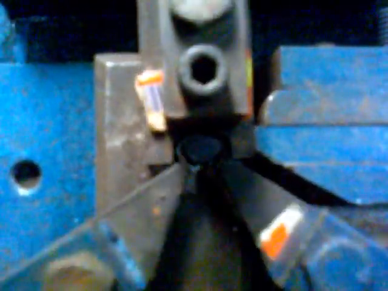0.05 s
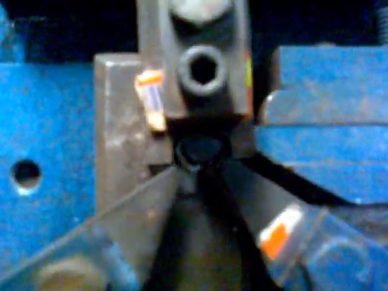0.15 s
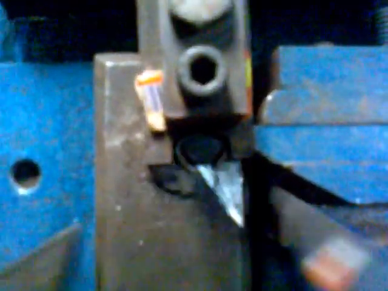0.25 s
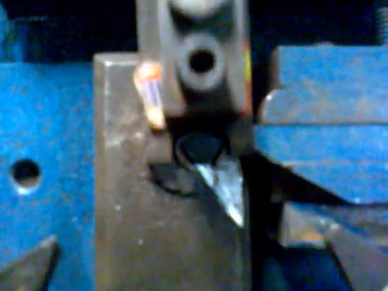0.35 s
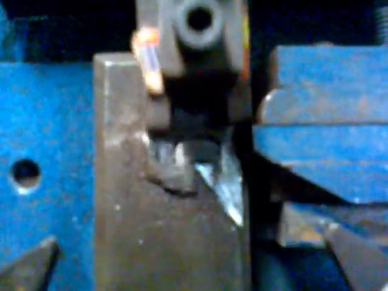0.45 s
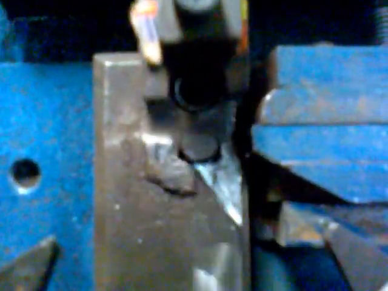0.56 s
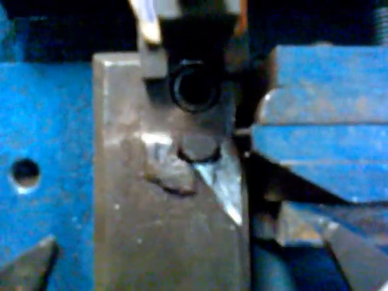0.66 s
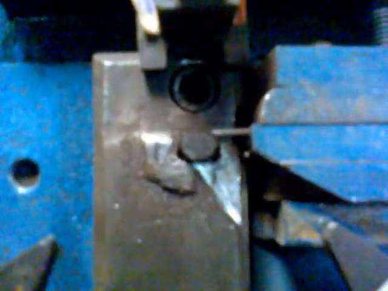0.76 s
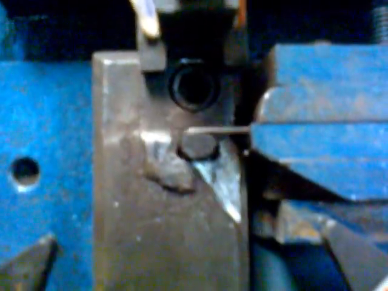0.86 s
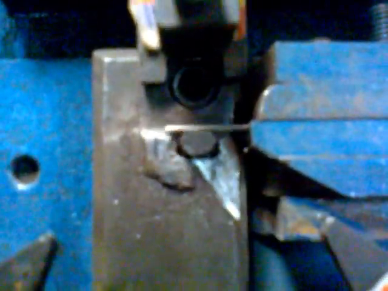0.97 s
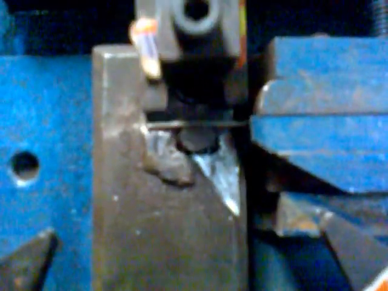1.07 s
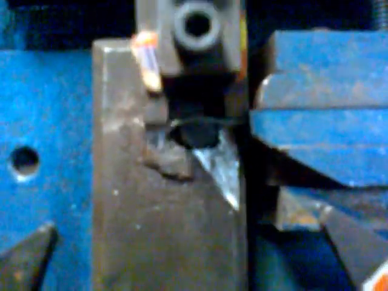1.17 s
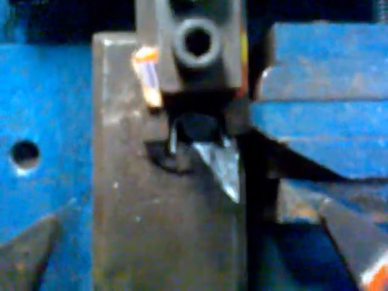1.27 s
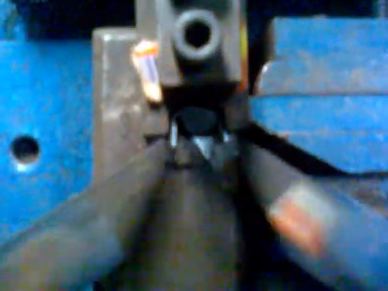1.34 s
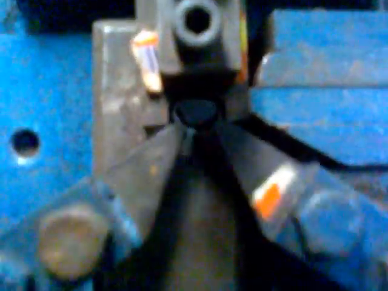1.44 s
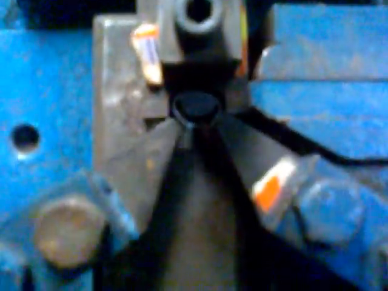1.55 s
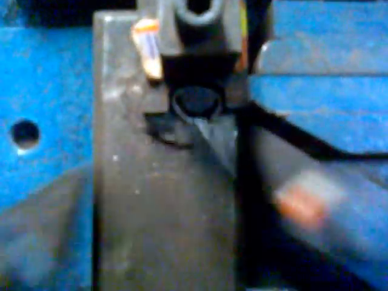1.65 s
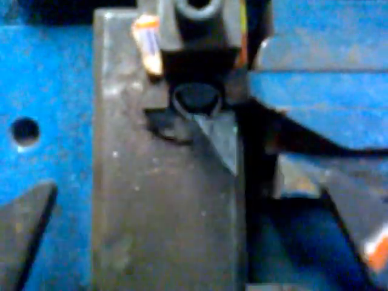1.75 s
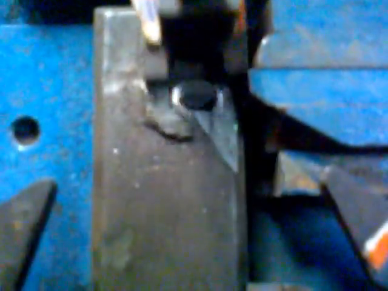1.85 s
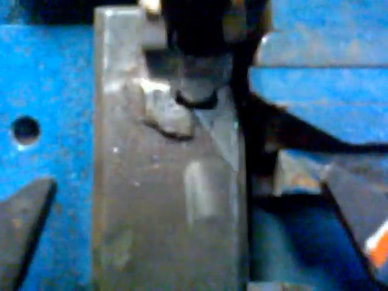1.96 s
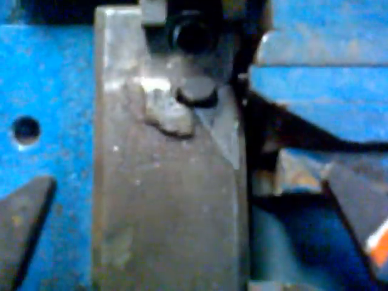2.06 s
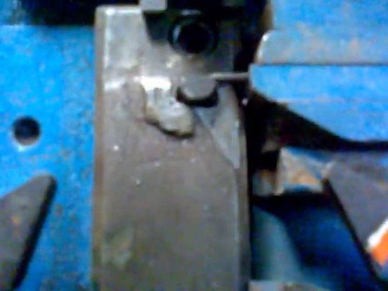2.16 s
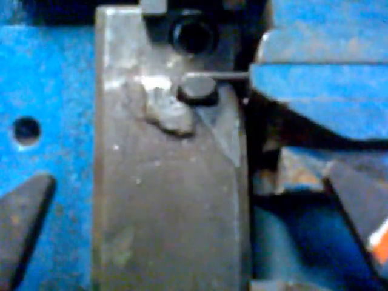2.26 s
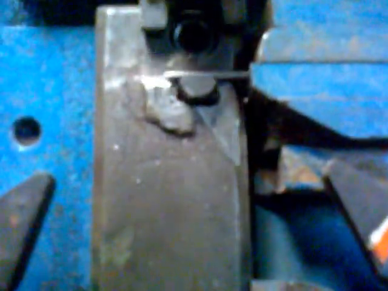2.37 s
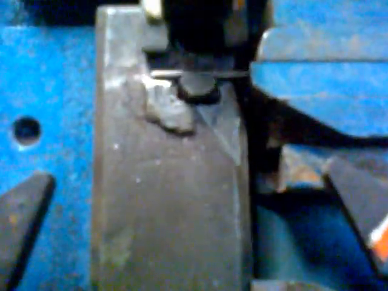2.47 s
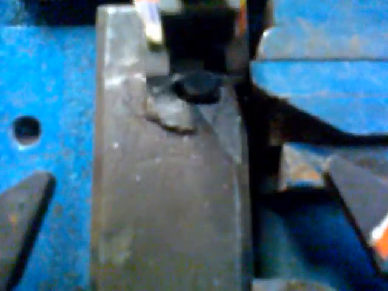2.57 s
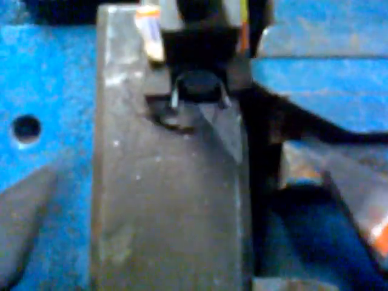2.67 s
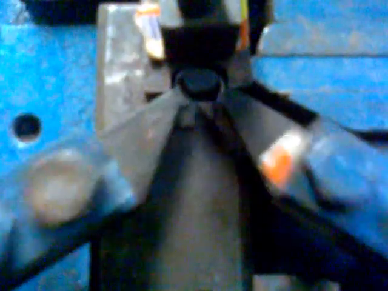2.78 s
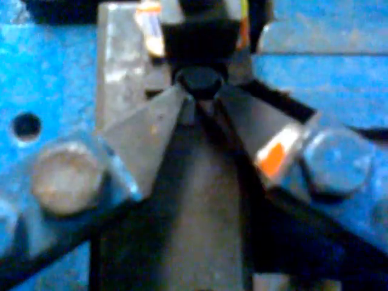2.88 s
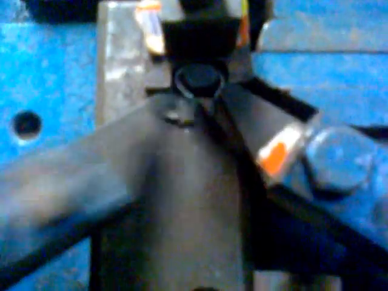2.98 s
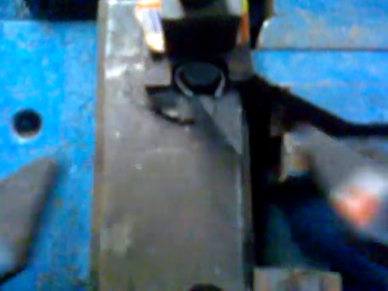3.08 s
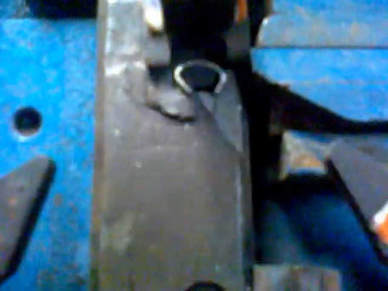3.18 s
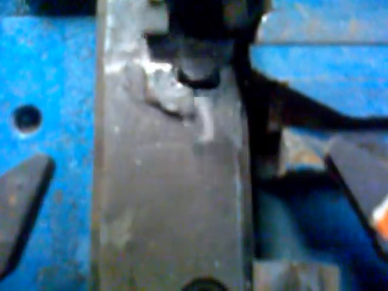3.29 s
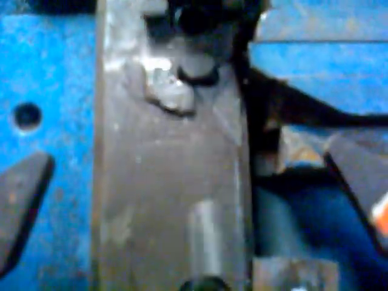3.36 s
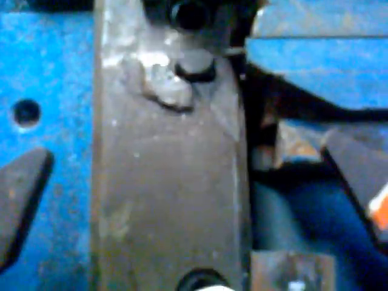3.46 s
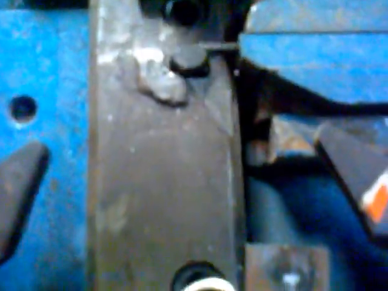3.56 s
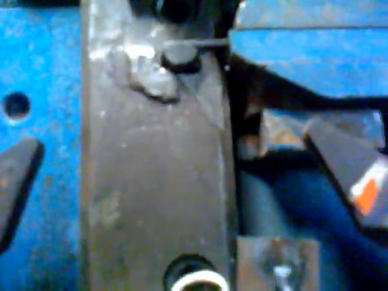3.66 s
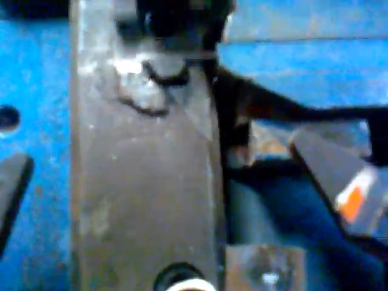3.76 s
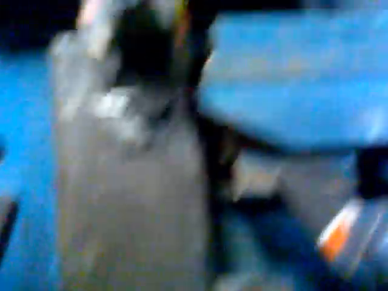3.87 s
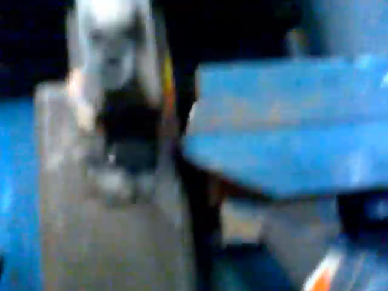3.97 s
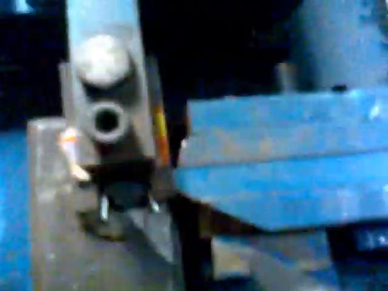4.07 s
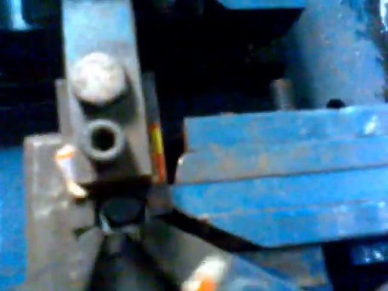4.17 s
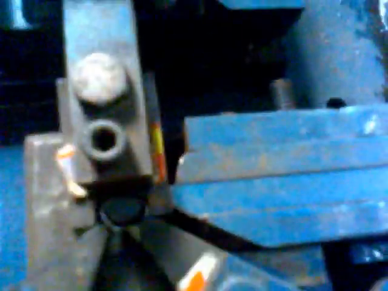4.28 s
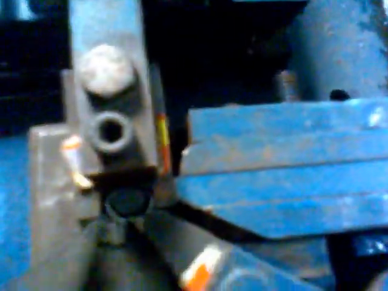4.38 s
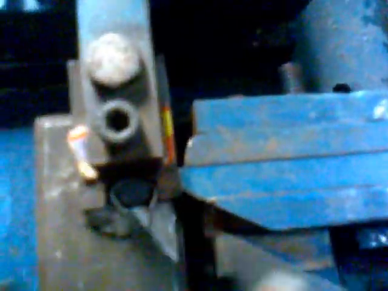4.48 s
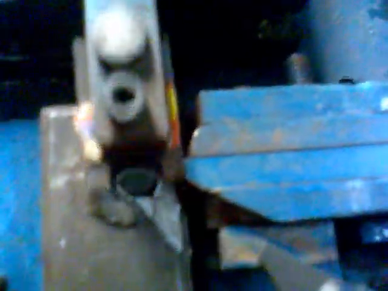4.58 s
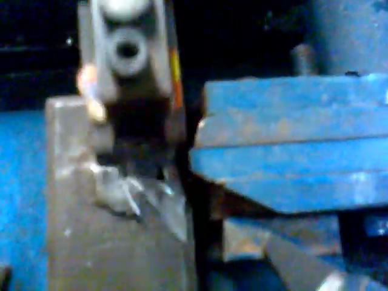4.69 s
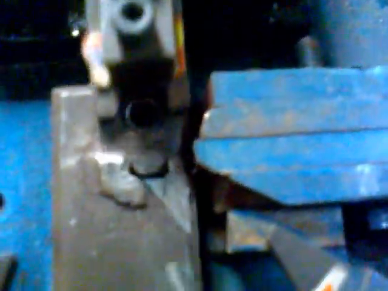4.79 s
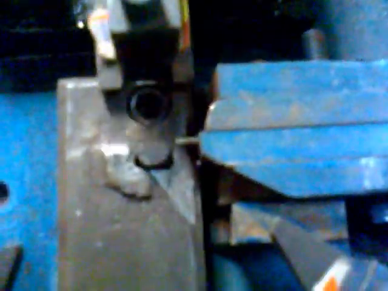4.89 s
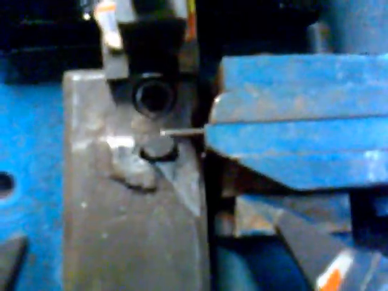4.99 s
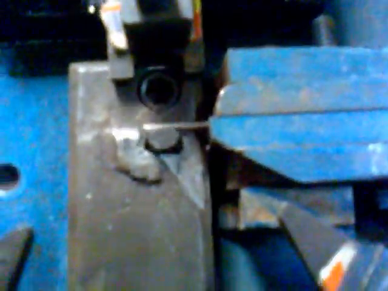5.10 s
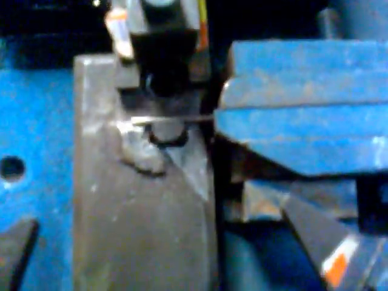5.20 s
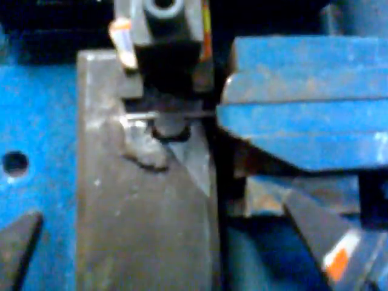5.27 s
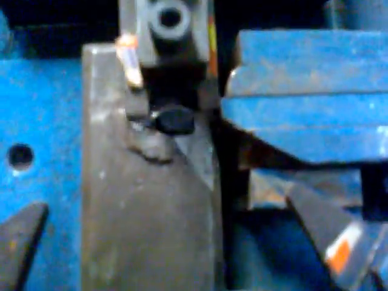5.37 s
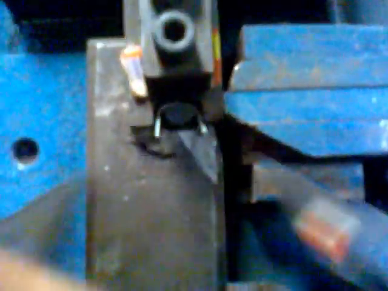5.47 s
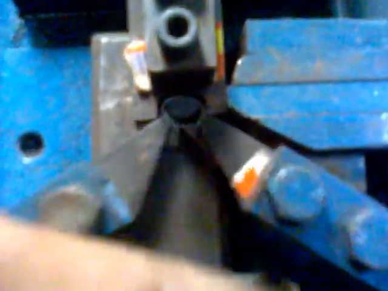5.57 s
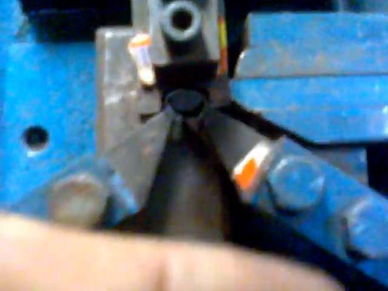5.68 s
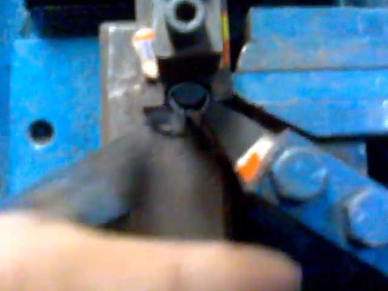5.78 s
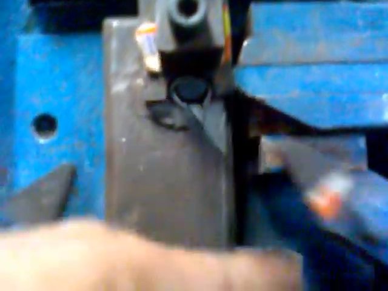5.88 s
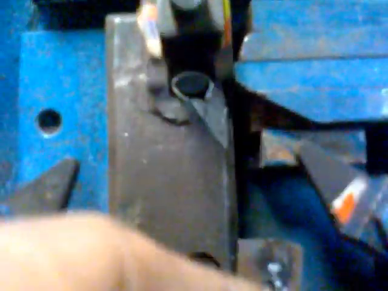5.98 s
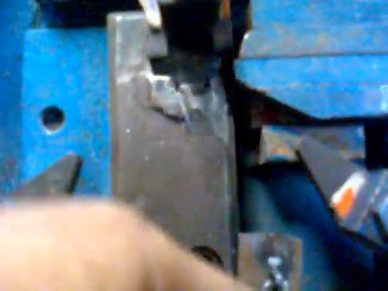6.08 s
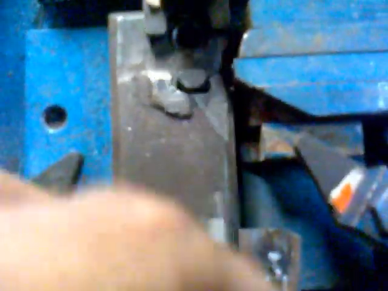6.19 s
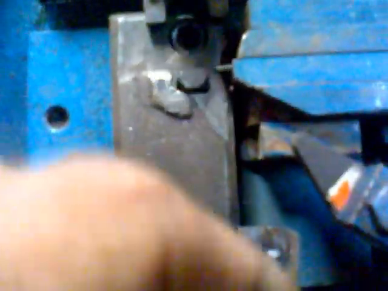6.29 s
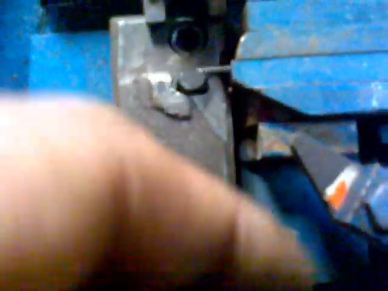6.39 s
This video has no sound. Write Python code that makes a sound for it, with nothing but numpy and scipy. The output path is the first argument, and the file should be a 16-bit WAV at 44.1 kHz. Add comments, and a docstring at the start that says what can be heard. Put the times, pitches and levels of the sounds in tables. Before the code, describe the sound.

Close, loud metallic clatter repeats every 1.4 seconds over a low grinding rumble; a small ring skitters and a piece of wire lands sharply at the end.

```python
"""Close to a wire-bending machine: cams and motor rumble throughout, over faint shop noise and hiss.
Five cycles, one about every 1.4 s: the slide cuts the wire, two arms bend it and swing open, the slide lifts.
Blows are filtered noise plus fading tones; a steel stop and the arms ring on, and small joints tick.
The microphone is jolted at 4 s, a bent ring skitters from 4.8 s, and the loudest loose wire lands at 6.3 s.
The overloaded microphone rounds off the loudest peaks."""
import sys
import numpy as np
from scipy import signal
from scipy.fft import rfft, irfft
from scipy.io import wavfile

SR = 44100
rng = np.random.default_rng(int(sys.argv[2]) if len(sys.argv) > 2 else 0)


def unload_wav(signal):
    """Save mono or channel-first audio to the path in sys.argv[1] as 16-bit WAV at rate SR, clipped to [-1, 1]."""
    wavfile.write(
        sys.argv[1],
        SR,
        np.round(np.clip(np.atleast_2d(signal).T, -1, 1) * 32767).astype(np.int16),
    )


N = 284004

# Strokes of the machine, all listed as (time [s], relative level [dB]).
# The slide cuts the wire: (time [s], level [dB])
CUT_STROKES = [(0.0057, 0), (1.4033, 0.5), (2.806, 0), (4.2048, 0), (5.6027, -1.5)]
# The second arm lands and grips the wire: (time [s], level [dB])
GRIP_STROKES = [(0.0871, 1), (1.4861, -1), (2.8872, -0.064), (4.288, -0.75), (5.6803, -0.077)]
# The arms close on the steel stop: (time [s], level [dB])
CLOSE_STROKES = [(0.1722, -0.67), (1.5704, -0.051), (2.9717, 0), (4.371, -1.4), (5.7672, 0)]
# The arms swing open: (time [s], level [dB])
OPEN_STROKES = [(0.3777, -2), (1.7756, -3.5), (3.173, -0.5), (4.5746, 0), (5.9711, -5)]
# The slide lifts: (time [s], level [dB])
LIFT_STROKES = [(0.489, -1.3), (1.8851, 1), (3.2845, 0.16), (4.6837, 0.91), (6.0828, 1)]
# Tone colour of the lifting slide, also used for the ticking joints: (frequency [Hz], relative level [dB])
LIFT_SPECTRUM = [(40, -21.5), (130, -20.5), (250, 0), (450, -5.5), (900, 6.5), (1150, 3), (1900, 7.5),
                 (2850, 2), (3700, 5), (4700, -3.5), (6100, -2.5), (7000, -13), (10500, -16.5),
                 (15000, -29)]
# Tone colour of scraping wire: (frequency [Hz], relative level [dB])
SCRAPE_SPECTRUM = [(1000, -17), (3600, -12), (4600, 9), (5300, -4), (6200, 2.5), (7600, -2.5), (9500, -15),
                   (11500, -5), (13000, -20), (15000, -12)]


def amp(db):
    """Turns decibels into a plain multiplier."""
    return 10 ** (np.asarray(db) / 20)


def evened(x):
    """Scales a sound to an average (rms) strength of 1."""
    return x / np.sqrt(np.mean(x ** 2) + 1e-20)


def read(points, hz):
    """Reads a curve between its points, with frequency spaced as the ear hears it (logarithmically)."""
    f, value = np.transpose(points)
    return np.interp(np.log(hz + 1), np.log(f + 1), value)


def add(mix, s, sound):
    """Mixes a sound in at time s, cutting off what runs past the end."""
    part = mix[max(0, round(s * SR)):][:len(sound)]
    part += sound[:len(part)]


def noise(colour, count=N):
    """Steady noise with a given tone colour and an rms of 1."""
    gain = amp(read(colour, np.fft.rfftfreq(count, 1 / SR)))
    return evened(irfft(rfft(rng.standard_normal(count)) * gain, count))


def drift(hz):
    """Slow random wandering, up to roughly hz swings a second, with an rms of 1."""
    keep_slow = np.exp(-(np.fft.rfftfreq(N, 1 / SR) / hz) ** 2)
    return evened(irfft(rfft(rng.standard_normal(N)) * keep_slow, N))


def fuzzy(hz, width_hz, count):
    """A tone blurred into a narrow band of noise, with an rms of 1."""
    lowpass = signal.butter(2, width_hz / 2, fs=SR, output="sos")
    band = signal.sosfilt(lowpass, rng.standard_normal((2, count + SR // 4)))
    wobble = (band[0] + 1j * band[1])[-count:]  # the filter has settled by then
    return evened((wobble * np.exp(2j * np.pi * hz * np.arange(count) / SR)).real)


def causal(gain_db):
    """A filter with this tone colour whose energy comes as early as possible (minimum phase)."""
    log_gain = np.log(amp(np.r_[gain_db, gain_db[-2:0:-1]]))
    return np.fft.ifft(np.exp(np.conj(signal.hilbert(log_gain)))).real


def ring(modes, t):
    """Fading sine tones, each started at a random point of its swing."""
    return sum(amp(db - 60 * t / t60) * np.sin(2 * np.pi * (hz * t + rng.random())) for hz, db, t60 in modes)


def dense_ring(t60s, size=16384):
    """Stands for countless close tones: noise split into bands that each fade at their own speed."""
    t, hz = np.arange(size) / SR, np.fft.rfftfreq(size, 1 / SR)
    centres = [f for f, _ in t60s]
    spectrum = rfft(rng.standard_normal(size))
    out = np.zeros(size)
    for band, (_, t60) in zip(np.eye(len(t60s)), t60s):
        share = read(list(zip(centres, band)), hz)  # 1 at its own centre, 0 at the neighbours
        out += irfft(spectrum * share) * amp(-60 * t / t60)
    return out


def drive():
    """The drive whines as blurred, unsteady tones over the steady noise of the shop."""
    # Shop noise: (frequency [Hz], relative level [dB])
    shop_spectrum = [(15, -32.5), (25, -13), (43, 3), (175, -8), (217, 5), (394, -6.5), (439, -7.5),
                     (714, 3), (863, -5), (1440, -6), (1740, -4), (4490, -30), (6210, -51.5), (7110, -54.5),
                     (16000, -52.5)]
    # Whine tones: (frequency [Hz], width [Hz], level [dB])
    whine_tones = [(87.6, 9, -56), (572, 8.3, -54.5), (604, 14, -58), (675, 9, -58), (692, 3.1, -52.5)]
    whine = sum(amp(db) * fuzzy(hz, width, N) for hz, width, db in whine_tones)
    return whine + amp(-47) * noise(shop_spectrum)


def cam_load():
    """The load on the cams in dB; its curve starts over at every cut."""
    # Load through a cycle: (time since the cut [s], relative level [dB])
    load_curve = [(0, -25.5), (.16, -27.5), (.27, -30.5), (.5, -25), (.78, -36), (1.02, -45.5),
                  (1.28, -42.5), (1.4, -31.5)]
    t, starts = np.arange(N) / SR, np.array([s for s, _ in CUT_STROKES])
    cycle = np.maximum(np.searchsorted(starts, t) - 1, 0)
    return np.interp(t - starts[cycle], *np.transpose(load_curve))


def cams(gain_db, grains_per_s=200, grain_share=0.6, flutter_db=-1.0, dull_hz=4500):
    """Rollers grind over the cams: steady noise and small dull rattles, louder under load."""
    # Rumble: (frequency [Hz], relative level [dB])
    cam_spectrum = [(18, -43.5), (30, -10), (75, -1), (311, -1), (394, -1), (499, -3), (666, 4),
                    (866, -9.5), (1280, -5.5), (2750, -19), (3580, -15), (5450, -26.5), (16000, -42)]
    grains = rng.standard_normal(N) * (rng.random(N) < grains_per_s / SR)
    t = np.arange(2048) / SR
    grain = rng.standard_normal(len(t)) * amp(-60 * t / 0.18)
    colour = causal(read(cam_spectrum, np.fft.rfftfreq(len(t), 1 / SR)))
    rattle = signal.fftconvolve(grains, signal.fftconvolve(grain, colour))[:N]
    rattle = evened(signal.sosfilt(signal.butter(2, dull_hz, fs=SR, output="sos"), rattle))
    share = np.clip(grain_share, 0, 1)
    level = amp(cam_load() + gain_db + flutter_db * drift(23))
    return level * (np.sqrt(share) * rattle + np.sqrt(1 - share) * noise(cam_spectrum))


def feed():
    """Wire rubs through the feed guide: a narrow band of noise, some hissing, one thin, often sinking in pitch."""
    # Rubs: (time [s], length [s], start pitch [Hz], end pitch [Hz], half width [Hz], level before the fades [dB])
    rubs = [(1.07, 0.15, 4480, 4670, 302, -56), (1.075, 0.17, 7160, 7160, 40, -66),
            (2.29, 0.13, 4570, 3700, 330, -53), (3.519, 0.125, 4670, 4370, 330, -58),
            (3.603, 0.14, 4500, 3680, 330, -51.5)]
    out = np.zeros(N)
    for s, length, start_hz, end_hz, half_width_hz, db in rubs:
        count = round(length * SR)
        lowpass = signal.butter(2, half_width_hz, fs=SR, output="sos")
        band = signal.sosfilt(lowpass, rng.standard_normal(SR))[:count]
        glide = np.sin(2 * np.pi * np.cumsum(np.linspace(start_hz, end_hz, count)) / SR)
        add(out, s, amp(db) * evened(band * glide) * np.hanning(count))
    return out


def chatter(gain_db, ticks_per_s=130, spread_db=4.5, t60=0.011, steepness=2.2, size=2048):
    """Loose joints tick at random while the cams are loaded and fade steeply as the load eases."""
    happens = rng.random(N) < ticks_per_s / SR
    strength = amp(spread_db * np.minimum(rng.exponential(1, N), 3)) * happens
    crack = rng.standard_normal(size) * amp(-60 * np.arange(size) / SR / t60)
    tick = signal.fftconvolve(crack, causal(read(LIFT_SPECTRUM, np.fft.rfftfreq(size, 1 / SR))))
    load_db = cam_load()
    level = amp(gain_db + steepness * (load_db - load_db.max()))
    return level * evened(signal.fftconvolve(strength, tick)[:N])


def thumps(rise=0.005, width=0.3):
    """Heavy moves shake the bed with short, dull booms (blurred fading tones); one jolt shakes the microphone."""
    # Thumps in every cycle: (time since the cut [s], relative level [dB], pitch [Hz], time to fade by 60 dB [s])
    bed_thumps = [(-.001, -12, 223, 0.089), (0.077, -23, 80, 0.11), (0.174, -23, 70, 0.085)]
    # Booms of the one jolt: (time [s], relative level [dB], pitch [Hz], time to fade by 60 dB [s])
    jolt_booms = [(4.003, -26.5, 314, 0.037), (4.004, -16.5, 448, 0.038), (4.005, -16, 618, 0.055)]
    out, t = np.zeros(N), np.arange(SR // 3) / SR
    booms = [(s + delay, db, hz, t60) for s, _ in CUT_STROKES for delay, db, hz, t60 in bed_thumps]
    for s, db, hz, t60 in booms + list(jolt_booms):
        level = amp(db - 60 * t / t60) * (1 - np.exp(-t / rise))
        add(out, s, level * fuzzy(hz, width * hz, len(t)))
    return out


def skitter(skips_per_s=170, t60=0.048, scrape_share=0.21, flutter_db=4.5, count=90, channels=3):
    """A bent ring skips and scrapes down the chute; each touch sounds many thin tones."""
    # Loudness of the skitter: (time [s], relative level [dB])
    skitter_level = [(4.78, -64), (4.86, -44), (4.96, -50), (5.07, -50), (5.11, -56), (5.17, -49.5),
                     (5.249, -62), (5.32, -56.5), (5.39, -87)]
    t = np.arange(SR // 8) / SR
    hz = rng.uniform(3500, 15500, count)
    touches = np.zeros(N)
    for side in np.array_split(hz, channels):  # each side of the ring has its own tones
        skips = rng.standard_normal(N) * (rng.random(N) < skips_per_s / SR)
        tones = ring([(f, read(SCRAPE_SPECTRUM, f), t60) for f in side], t)
        touches += signal.fftconvolve(skips, tones)[:N]
    s, db = np.transpose(skitter_level)
    level = np.interp(np.arange(N) / SR, s, amp(db), left=0, right=0) * amp(flutter_db * drift(28))
    return level * evened(evened(touches) + scrape_share * noise(SCRAPE_SPECTRUM))


def wire(rise=0.00064, blur_hz=110, detune=0.0045, spread_db=3, scrape_db=-3, scrape_t60=0.089):
    """Loose bits of wire land and buzz against the steel, which blurs their tones."""
    # Landings: (time [s], relative level [dB], share of low bending tones [0-1], share of high tones [0-1])
    wire_hits = [(0.799, -43.5, 0.16, 0.87), (2.204, -40.5, 0.1, 0.7), (3.458, -38, 0.15, 0.98),
                 (3.604, -42.5, 0, 1), (5.018, -35, 0.23, 0.67), (5.06, -35.5, 0.08, 0.75),
                 (5.075, -40, 0, 0.9), (5.16, -50, 0.66, 0), (5.291, -49, 0.2, 0.7),
                 (6.294, -17.5, 0.61, 0.56), (6.315, -27, 0.4, 0.46), (6.333, -25.5, 0.05, .7),
                 (6.419, -38, 0.05, 0.67)]
    # Natural tones of the wire: (frequency [Hz], relative level [dB], time to fade by 60 dB [s])
    wire_modes = [(1590, 11, 0.054), (3970, 1.5, 0.059), (6300, -12, 0.18), (6900, -14, 0.059),
                  (7530, -2.5, 0.042), (8420, -12.5, 0.12), (9370, -12, 0.076), (10180, -13.5, 0.079),
                  (11050, -11.5, 0.17), (11800, 0.5, 0.032), (12860, -16, 0.12), (14010, -8, .08)]
    out, t = np.zeros(N), np.arange(SR // 5) / SR
    for s, db, low, high in wire_hits:
        sound = amp(scrape_db - 60 * t / scrape_t60) * high * noise(SCRAPE_SPECTRUM, count=len(t))
        for hz, level, t60 in wire_modes:
            share = low if hz < 5000 else high
            tone = fuzzy(hz * (1 + detune * rng.standard_normal()), blur_hz, len(t))
            sound += share * amp(level + spread_db * rng.uniform(-0.5, 1) - 60 * t / t60) * tone
        add(out, s, amp(db) * sound * (1 - np.exp(-t / rise)))
    return out


def arms(gain_db=-5, rise=.002, blur_hz=70):
    """The bending arms keep a thin, high ring after they land; the sliding wire blurs it."""
    # Natural tones of the arms: (frequency [Hz], relative level [dB], time to fade by 60 dB [s])
    arm_modes = [(3130, -6, 0.31), (4610, 3.5, 0.29), (5300, -8.5, 0.39), (6800, -13.5, 0.27),
                 (7050, -14, 0.82)]
    # Strength in each of the five cycles: (relative level [dB])
    arm_levels = [-25, -30.5, -31.5, -22, -35]
    out, t = np.zeros(N), np.arange(SR // 2) / SR
    for (s, _), db in zip(GRIP_STROKES, arm_levels):
        tone = sum(amp(level - 60 * t / t60) * fuzzy(hz, blur_hz, len(t)) for hz, level, t60 in arm_modes)
        add(out, s, amp(gain_db + db) * tone * (1 - np.exp(-t / rise)))
    return out


def stop(rise=0.0017, close_db=8, lift_db=10, rebound_db=3, lift_delay=.0198, rebound_delay=.1115, detune=.015):
    """The steel stop rings as the arms close and the slide lifts, then more softly as the slide rebounds."""
    # Natural tones of the stop: (frequency [Hz], relative level [dB], time to fade by 60 dB [s])
    stop_modes = [(3450, -4, 0.038), (3414, -24, 0.09), (3593, -16.5, 0.028), (3330, -19, 0.14),
                  (3810, -24, 0.063), (4030, -22.5, 0.051), (4540, -37, 0.22)]
    # Strength of the rebound in each of the five cycles: (relative level [dB])
    rebound_levels = [-16.5, -8.5, -8.5, -30, -7.5]
    out, t = np.zeros(N), np.arange(SR // 4) / SR
    hits = [(s, close_db + db) for s, db in CLOSE_STROKES]
    hits += [(s + lift_delay, lift_db + db) for s, db in LIFT_STROKES]
    hits += [(s + rebound_delay, rebound_db + db) for (s, _), db in zip(LIFT_STROKES, rebound_levels)]
    for s, db in hits:
        stiffness = 1 + detune * rng.uniform(-1, 1)  # the contact shifts the pitch a little
        tone = ring([(hz * stiffness, level, t60) for hz, level, t60 in stop_modes], t)
        add(out, s, amp(db) * tone * (1 - np.exp(-t / rise)))
    return out


def rattles(strokes, rattle, scatter_db=4.0, ring_scatter=0.11, slop=.02):
    """Repeats a pattern of knocks at every stroke; loose joints vary each in time, strength and pitch."""
    rows = []
    for s, stroke_db in strokes:
        for delay, db, bright_db, part_hz in rattle:
            late, harder, higher = rng.uniform(-1, 1, 3)
            play = min(abs(delay), .03)
            time = s + delay + slop * play * late
            level_db = stroke_db + db + scatter_db * harder
            rows.append((time, level_db, bright_db, part_hz * np.exp(ring_scatter * higher)))
    return rows


def knocks(rows, colour, gain_db, crack_t60, casting_db, frame_db, part_db, part_t60=.02, rise=0.00073, size=4096):
    """Steel meets steel: a crack and a brief ring of the touching part, then castings and frame ring on."""
    # How long the heavy castings sound: (frequency [Hz], time to fade by 60 dB [s])
    casting_fades = [(60, .45), (250, 0.16), (900, 0.12), (2000, 0.11), (4500, 0.09), (14000, 0.057)]
    # Natural tones of the machine frame: (frequency [Hz], relative level [dB], time to fade by 60 dB [s])
    frame_modes = [(58, -31.5, 0.43), (228, -24.5, 0.21), (504, -29.5, 0.23), (664, -27, 0.7),
                   (867, -13, 0.067), (1198, -11, 0.067), (1830, -20.5, .06), (2650, -23.5, .07),
                   (3095, -54, .07), (3820, -15, .04), (4770, -21, 0.047), (5730, -31.5, 0.057),
                   (6580, -25, 0.027), (10100, -32.5, 0.094)]
    out, hz, t = np.zeros(N), np.fft.rfftfreq(size, 1 / SR), np.arange(3 * size) / SR
    treble = read([(2200, 0.062), (4800, 1.0)], hz)  # where brightness acts
    middle = signal.butter(2, [400, 2800], "band", fs=SR, output="sos")
    attack = round(.004 * SR)
    onset = 1 - np.exp(-t / rise)  # the oil film softens the first contact
    frame = np.array([amp(frame_db + db - 60 * t / t60) * np.exp(2j * np.pi * f * t)
                      for f, db, t60 in frame_modes])
    for s, db, bright_db, part_hz in rows:
        crack = rng.standard_normal(len(t)) * amp(-60 * t / crack_t60)
        body = amp(casting_db) * dense_ring(casting_fades, size=len(t))
        blow = signal.fftconvolve(crack + body, causal(read(colour, hz) + bright_db * treble))[:len(t)]
        blow /= signal.sosfilt(middle, (onset * blow)[:attack]).std()  # level goes by the attack's midrange
        phases = np.exp(2j * np.pi * rng.random((len(frame_modes), 1)))  # each blow meets the frame elsewhere
        blow += ring([(part_hz, part_db, part_t60)], t) + (phases * frame).real.sum(0)
        add(out, s, amp(db + gain_db) * onset * blow)
    return out


# Every rattle below lists its knocks as
# (delay after the stroke [s], relative level [dB], brightness [dB], pitch of the touching part [Hz]).


def slack_knocks():
    """Slack in the cams and wire feed knocks lightly around each opening, with stray knocks between."""
    # Tone colour: (frequency [Hz], relative level [dB])
    slack_spectrum = [(40, -11), (250, 3), (700, 2.5), (1800, 1.5), (3500, -10.5), (6000, -21),
                      (15000, -27.5)]
    # Rattle of the slack: (delay [s], level [dB], brightness [dB], pitch [Hz])
    slack_rattle = [(-.122, -27.5, -14, 710), (-.078, -23, -8.5, 1150), (-.036, -32.5, -7, 1300),
                    (.2757, -21.5, 7, 1600), (.318, -29.5, 9, 1300), (.409, -28.5, -10, 900),
                    (.646, -36.5, -1, 1100), (.886, -32.5, -11.5, 1150), (.918, -39.5, 2.5, 1250),
                    (.98, -35, -8, 1398)]
    # Stray knocks outside the cycle: (time [s], level [dB], brightness [dB], pitch [Hz])
    strays = [(1.379, -31.5, 5.5, 1680), (2.6326, -34.5, -10, 666), (2.7599, -21.5, -4.5, 1463),
              (4.005, -32, 7, 705), (4.039, -28.5, 7.5, 2350), (4.0971, -33.5, 0.5, 723),
              (4.1579, -24, -13, 1020), (4.1755, -26.5, 9, 1970), (4.2535, -21, 7, 3130),
              (5.6519, -16, 2, 3000), (5.8364, -25, 9.5, 980), (6.0699, -20, -8, 3940)]
    rows = rattles([(s, 0) for s, _ in OPEN_STROKES], slack_rattle) + list(strays)
    return knocks(rows, slack_spectrum, gain_db=-5.0, crack_t60=0.005, casting_db=-13.5, frame_db=6, part_db=10.5)


def lifting_blows():
    """The slide lifts, then chatters into its guide."""
    # The slide meets its guide: (time [s], level [dB])
    seatings = [(0.5361, 0), (1.9348, 0.11), (3.3326, 0.12), (4.7322, 0.22), (6.1395, 0.15)]
    # Rattle of the lift: (delay [s], level [dB], brightness [dB], pitch [Hz])
    lift_rattle = [(0, -2.5, -0.5, 3600), (.008, -18.5, -11, 2100), (0.021, -6.5, -0.5, 3450)]
    # Rattle in the guide: (delay [s], level [dB], brightness [dB], pitch [Hz])
    seat_rattle = [(-.008, -9.5, -5, 1457), (0, -1.5, -5.5, 1973), (.005, -4, 0, 1766),
                   (.0085, -8.5, 4, 3800), (.057, -25.5, 13.5, 2060)]
    rows = rattles(LIFT_STROKES, lift_rattle) + rattles(seatings, seat_rattle)
    return knocks(rows, LIFT_SPECTRUM, gain_db=-7.0, crack_t60=0.025, casting_db=-11.5, frame_db=-1.0, part_db=3.0)


def opening_blows():
    """The arms swing open and knock at the end of their swing."""
    # Tone colour: (frequency [Hz], relative level [dB])
    open_spectrum = [(40, -30), (130, -26.5), (300, -3.5), (600, -5), (1050, 2), (1250, 5), (1900, 1.5),
                     (2350, 1.5), (2900, -9.5), (3450, -2), (5300, -8), (5800, -15), (8000, -28),
                     (15000, -32.5)]
    # The arms reach the end of their swing: (time [s], level [dB])
    swing_ends = [(0.424, -0.5), (1.8211, -0.5), (3.2192, 2), (4.617, -2), (6.0124, -3)]
    # Rattle of the opening: (delay [s], level [dB], brightness [dB], pitch [Hz])
    open_rattle = [(0, -0.5, 3, 3417), (.0052, -5, 3.5, 1308), (.014, -9.5, 8.5, 1347),
                   (.0235, -3, -14, 1280), (.028, -6.5, 2, 1597)]
    # Rattle at the end of the swing: (delay [s], level [dB], brightness [dB], pitch [Hz])
    swing_rattle = [(0, -3, 6.5, 5010), (.0095, -12.5, -5, 1132)]
    rows = rattles(OPEN_STROKES, open_rattle) + rattles(swing_ends, swing_rattle)
    return knocks(rows, open_spectrum, gain_db=-5, crack_t60=0.022, casting_db=-15, frame_db=-1.0, part_db=7.5)


def forming_blows():
    """The slide cuts; the first arm touches, the second grips, the wire slips and the arms close."""
    # Tone colour: (frequency [Hz], relative level [dB])
    form_spectrum = [(40, -17.5), (90, -9), (220, -2.5), (470, -2), (580, 0.5), (720, -2), (900, 5.5),
                     (1200, 0.5), (1750, 3.5), (2500, -5.5), (3700, -7), (5200, -13), (7000, -18.5),
                     (15000, -35)]
    # The first arm touches the wire: (time [s], level [dB])
    arm_touches = [(0.0755, -4.5), (1.4751, 2.5), (2.8767, 0), (4.2738, -1), (5.6738, -0.5)]
    # The wire slips two or three times as it bends: (time [s], level [dB])
    slips = [(0.1177, 6.5), (0.133, 0.5), (.149, 0.5), (1.5192, -1), (1.5301, 9), (2.9181, -2.5),
             (2.9322, 4.5), (4.3147, -3.5), (4.3299, 1), (4.3526, -6.5), (5.7241, 3.5), (5.7454, -8)]
    # Rattle of the cut: (delay [s], level [dB], brightness [dB], pitch [Hz])
    cut_rattle = [(-.007, -21, 7, 2000), (0, -4, 10, 890), (.006, -6, -23, 950)]
    # Rattle of the touch: (delay [s], level [dB], brightness [dB], pitch [Hz])
    touch_rattle = [(0, -8, -1, 1300), (.0065, -10, -7, 2100)]
    # Rattle of the grip: (delay [s], level [dB], brightness [dB], pitch [Hz])
    grip_rattle = [(0, -2, -1, 1840), (.0025, -11, 11, 4570), (.012, -14.5, -5.5, 1540),
                   (.021, -14.5, -7.5, 1231)]
    # Rattle of a slip: (delay [s], level [dB], brightness [dB], pitch [Hz])
    slip_rattle = [(0, -9, 4.5, 2700), (.005, -17.5, -1, 1310)]
    # Rattle of the closing: (delay [s], level [dB], brightness [dB], pitch [Hz])
    close_rattle = [(-.0115, -7, -4.5, 1970), (-.007, -3.5, 5.5, 3870), (0, -12, 13, 3530),
                    (.008, -4, 7.5, 3320), (.024, -10.5, 5, 3570)]
    rows = rattles(CUT_STROKES, cut_rattle) + rattles(arm_touches, touch_rattle)
    rows += rattles(GRIP_STROKES, grip_rattle) + rattles(slips, slip_rattle)
    rows += rattles(CLOSE_STROKES, close_rattle)
    return knocks(rows, form_spectrum, gain_db=-5.5, crack_t60=0.018, casting_db=-14.5, frame_db=-3.5, part_db=5.5)


def workshop(x, wet_db, build_up=0.0062):
    """Adds a faint tail from the walls and the machine's guards: noise that builds up, then fades."""
    # (frequency [Hz], time to fade by 60 dB [s])
    tail = dense_ring([(100, 0.65), (700, 0.45), (2500, 0.29), (6000, 0.1), (14000, 0.24)], size=SR)
    tail *= 1 - np.exp(-np.arange(len(tail)) / SR / build_up)
    return x + amp(wet_db) * signal.fftconvolve(x, tail / np.linalg.norm(tail))[:N]


def scene():
    """Blows, rings, ticks, thumps and loose wire sound into the workshop; cams, drive and feed run underneath."""
    blows = forming_blows() + opening_blows() + lifting_blows() + slack_knocks()
    near = blows + stop() + arms() + chatter(gain_db=-35) + wire() + skitter() + thumps()
    return (workshop(near, wet_db=-17.5) + cams(gain_db=-4.5) + drive() + feed())[None]


def record(dry, ceiling=1.0, knee=5, edge_hz=16000):
    """The microphone hisses faintly, rounds off the loudest peaks and loses the highest treble."""
    # Hiss: (frequency [Hz], relative level [dB])
    hiss_spectrum = [(1000, -10.5), (6000, 3), (9000, -5.5), (15000, 7.5)]
    heard = dry + amp(-62.5) * noise(hiss_spectrum)
    clipped = heard / (1 + abs(heard / ceiling) ** knee) ** (1 / knee)
    lowpass = signal.firwin(401, edge_hz, window=("kaiser", 8), fs=SR)
    return signal.oaconvolve(clipped, lowpass[None], "same")


dry = scene()
out = record(dry)
unload_wav(out)
```